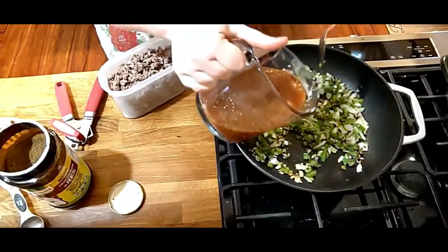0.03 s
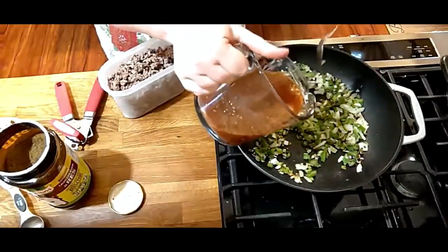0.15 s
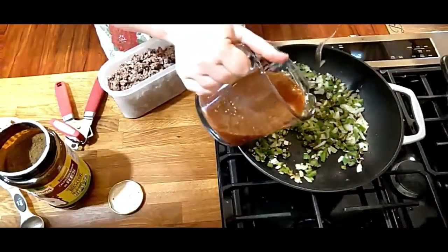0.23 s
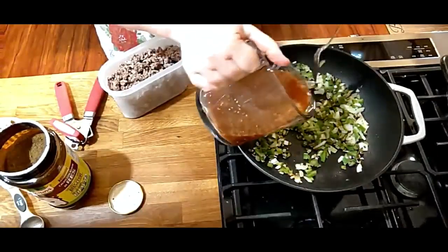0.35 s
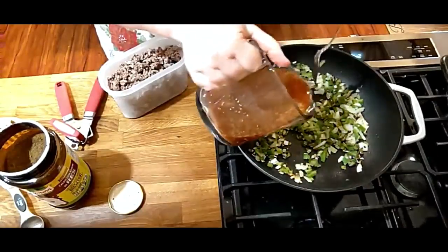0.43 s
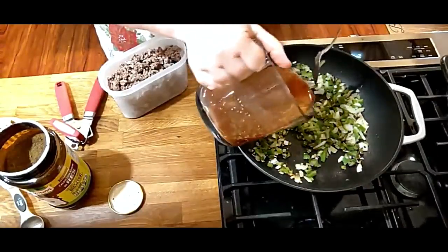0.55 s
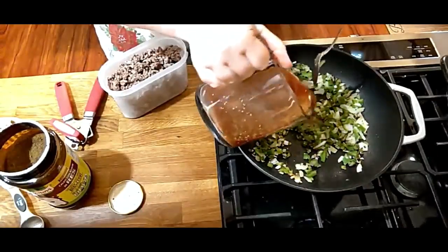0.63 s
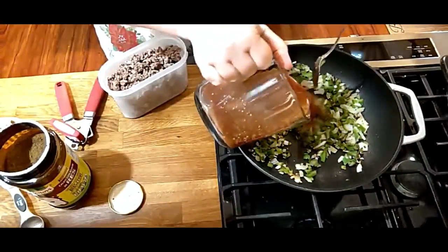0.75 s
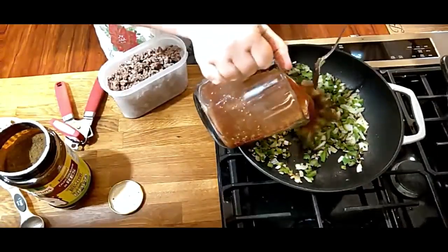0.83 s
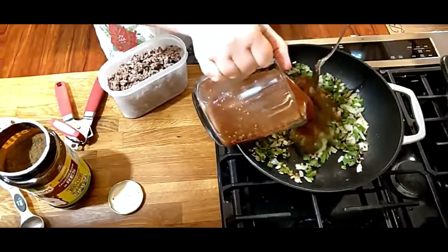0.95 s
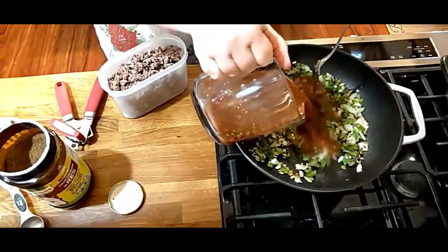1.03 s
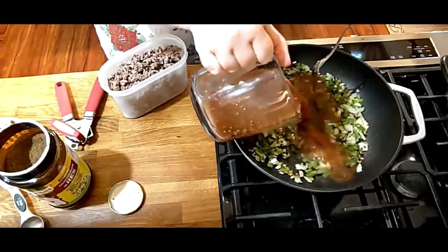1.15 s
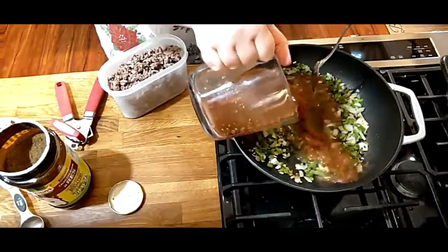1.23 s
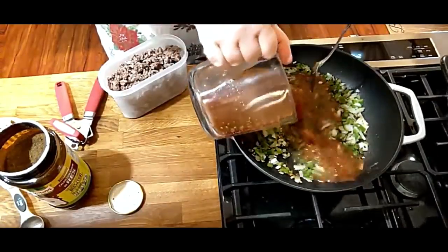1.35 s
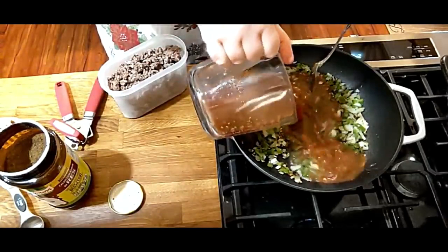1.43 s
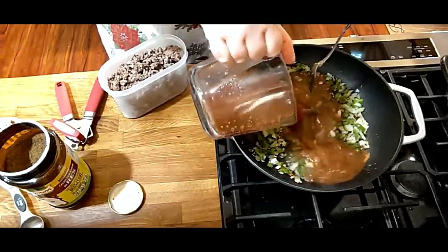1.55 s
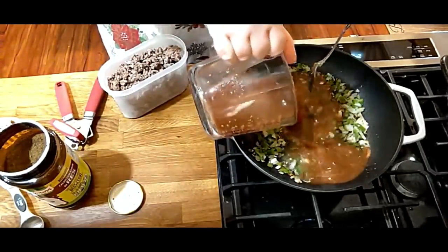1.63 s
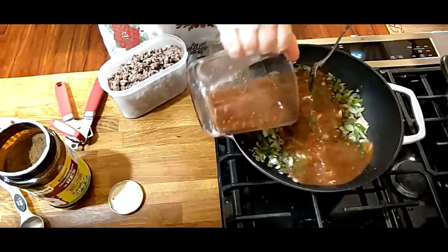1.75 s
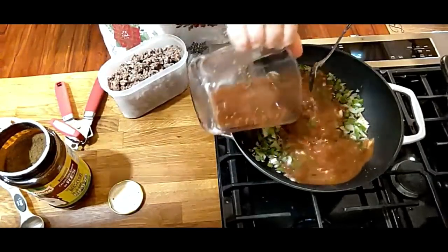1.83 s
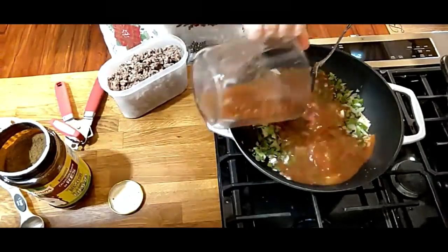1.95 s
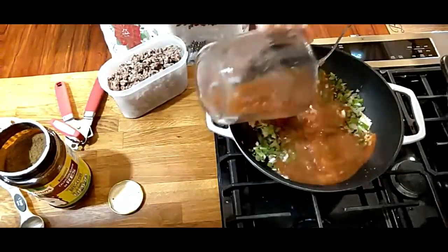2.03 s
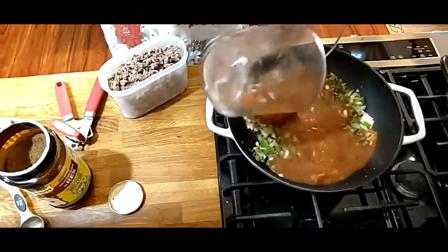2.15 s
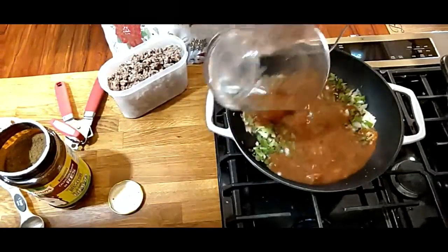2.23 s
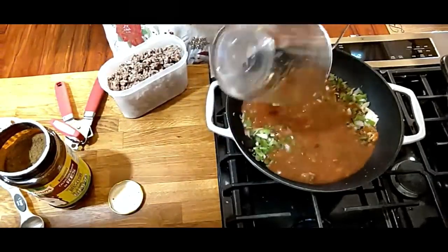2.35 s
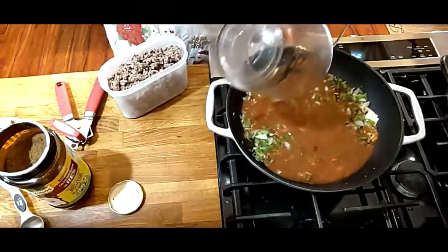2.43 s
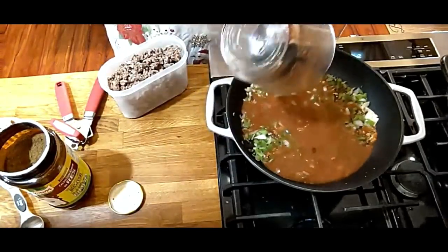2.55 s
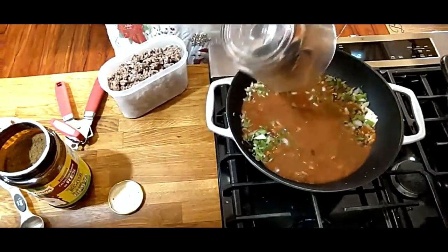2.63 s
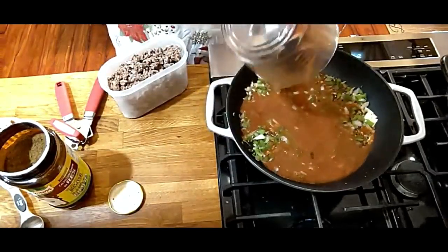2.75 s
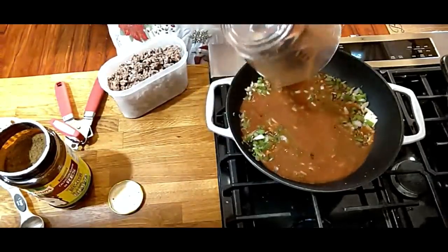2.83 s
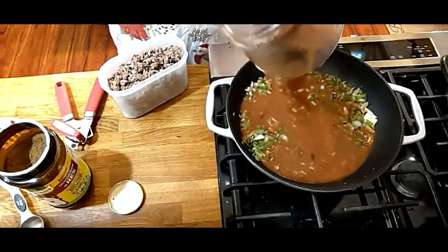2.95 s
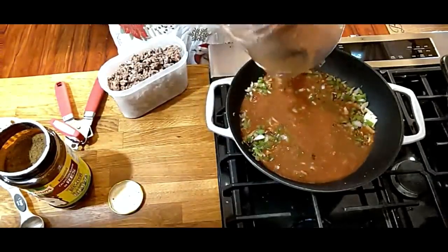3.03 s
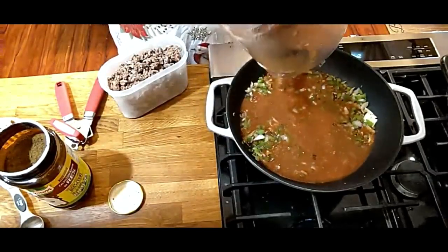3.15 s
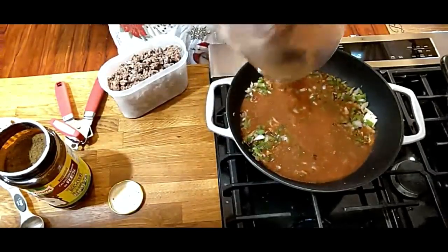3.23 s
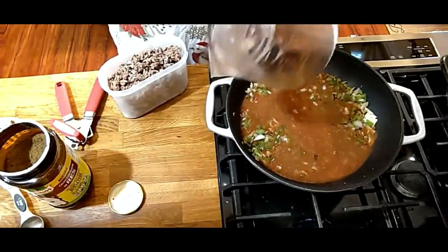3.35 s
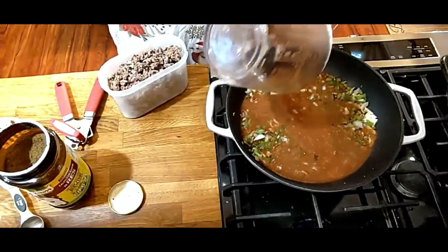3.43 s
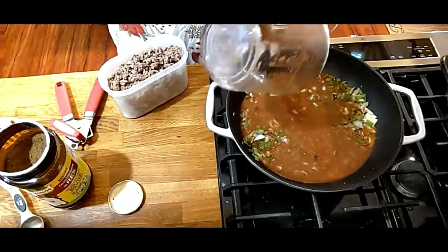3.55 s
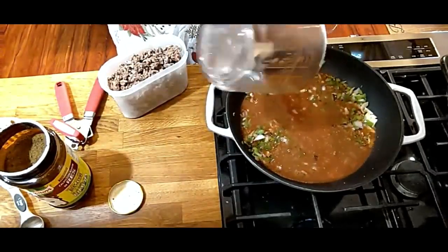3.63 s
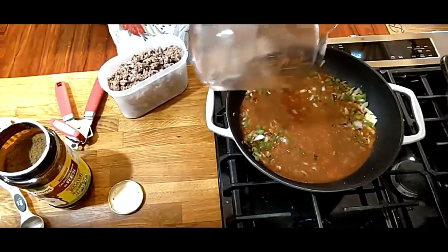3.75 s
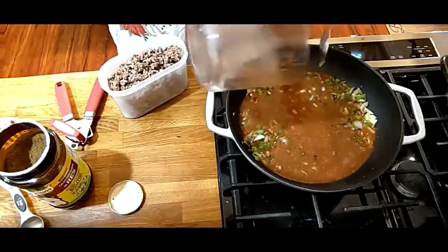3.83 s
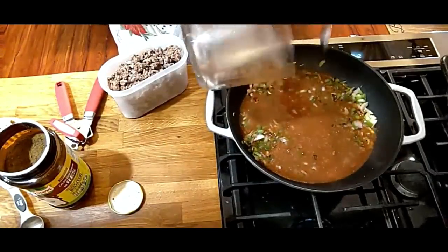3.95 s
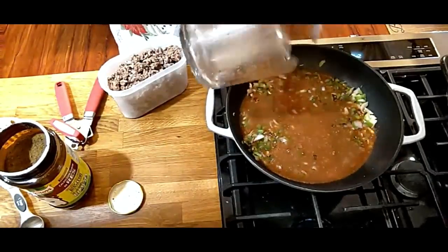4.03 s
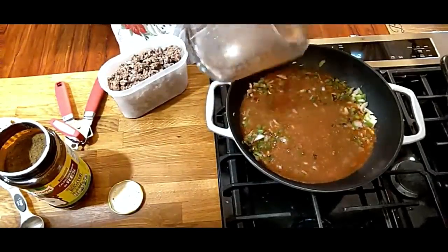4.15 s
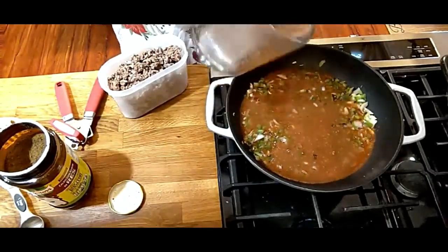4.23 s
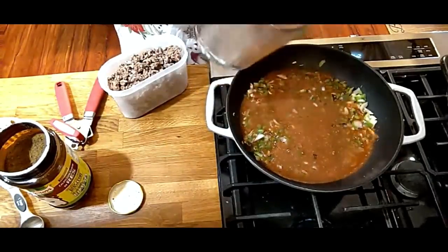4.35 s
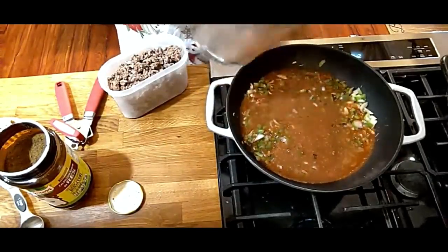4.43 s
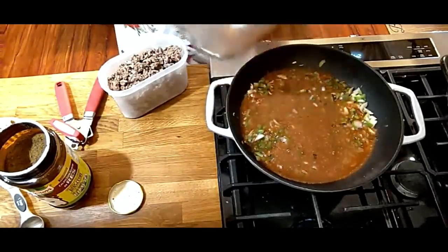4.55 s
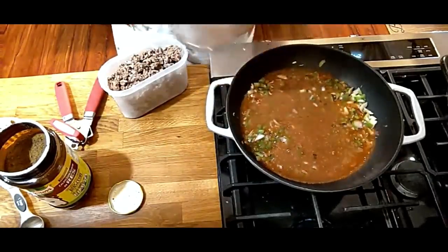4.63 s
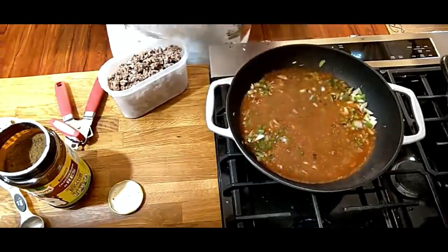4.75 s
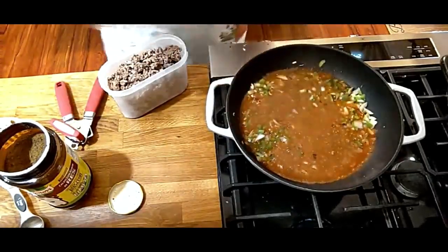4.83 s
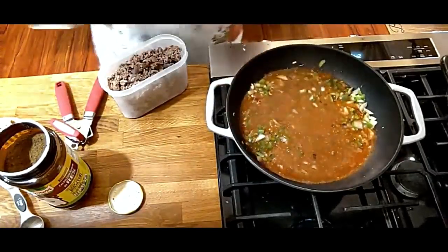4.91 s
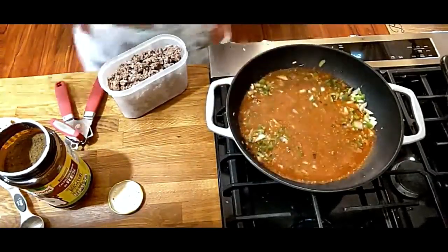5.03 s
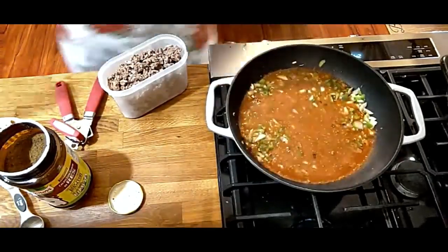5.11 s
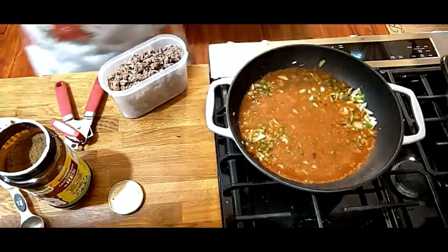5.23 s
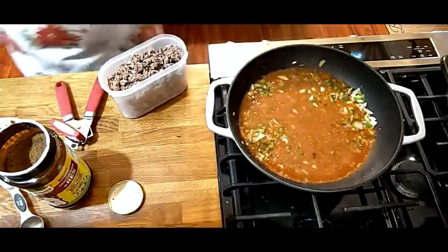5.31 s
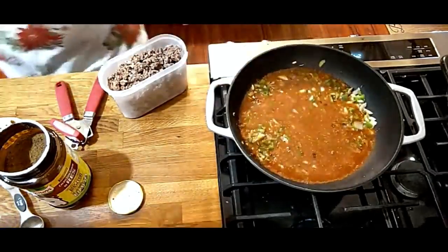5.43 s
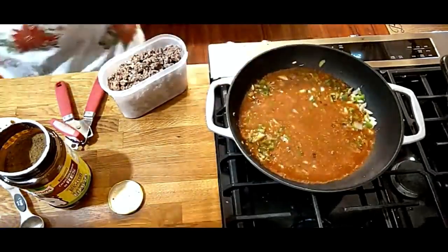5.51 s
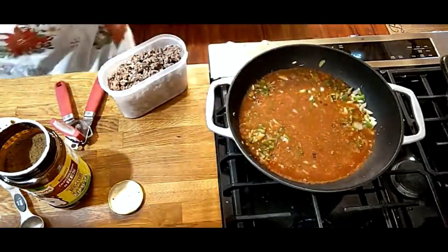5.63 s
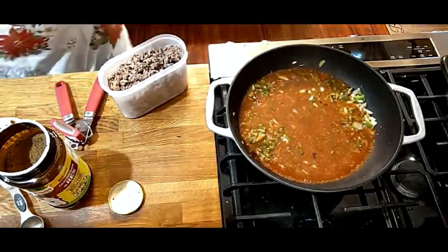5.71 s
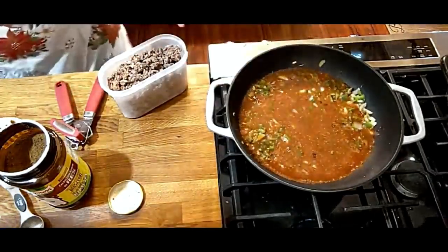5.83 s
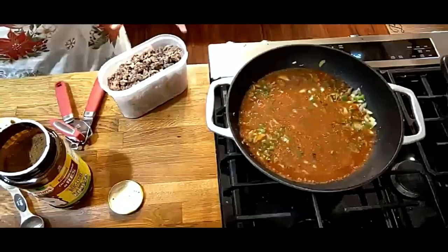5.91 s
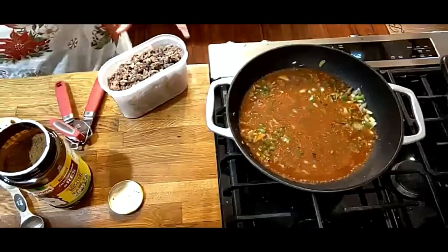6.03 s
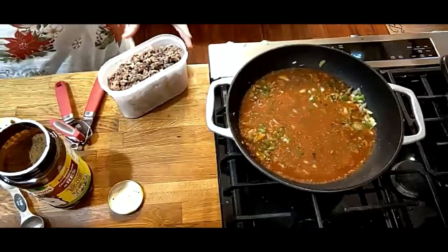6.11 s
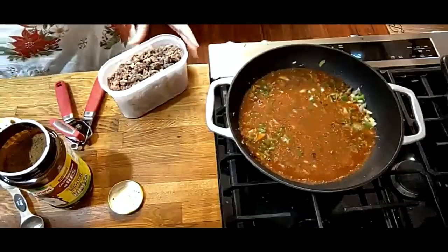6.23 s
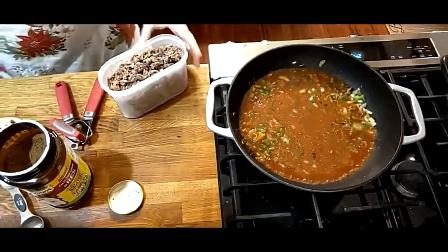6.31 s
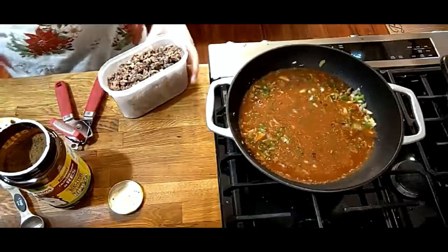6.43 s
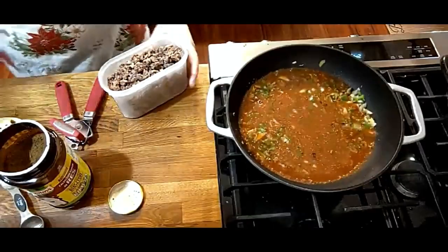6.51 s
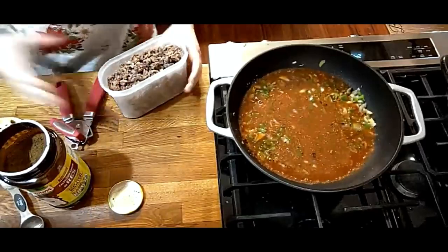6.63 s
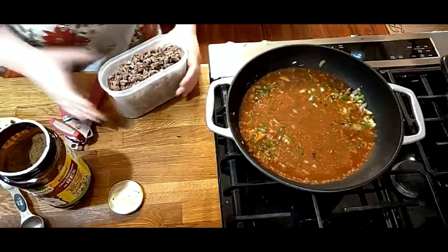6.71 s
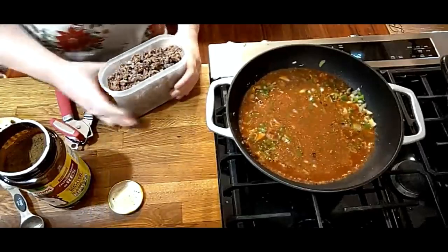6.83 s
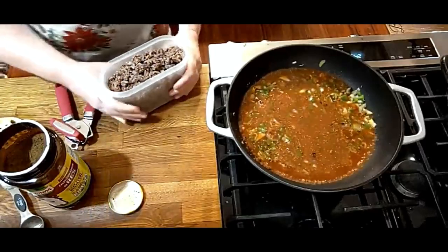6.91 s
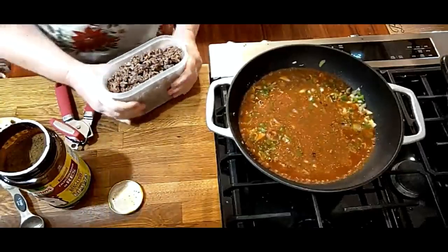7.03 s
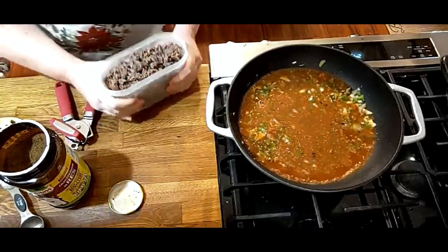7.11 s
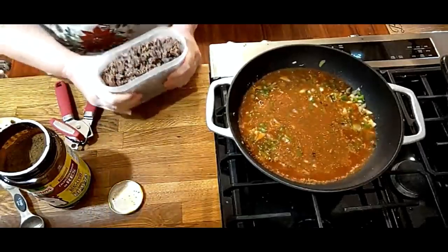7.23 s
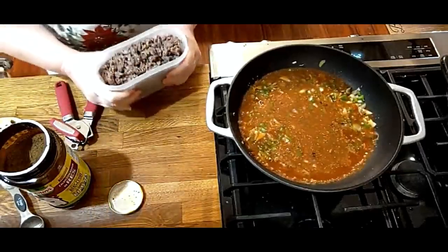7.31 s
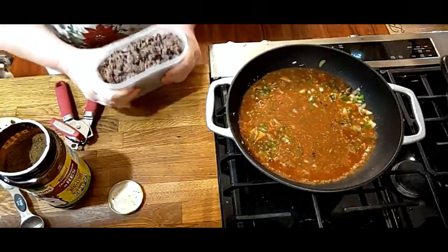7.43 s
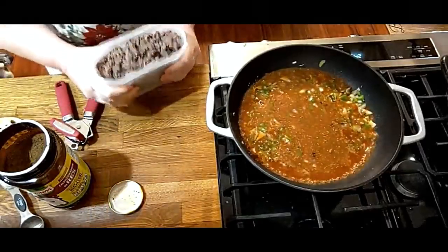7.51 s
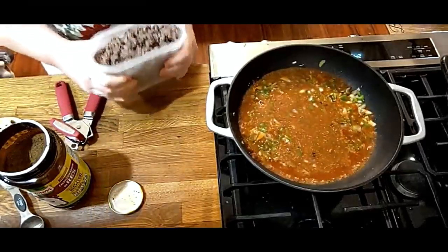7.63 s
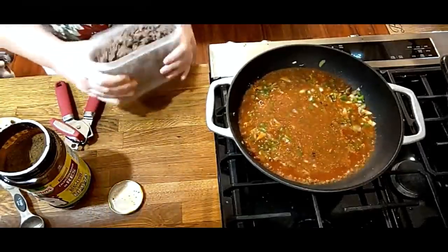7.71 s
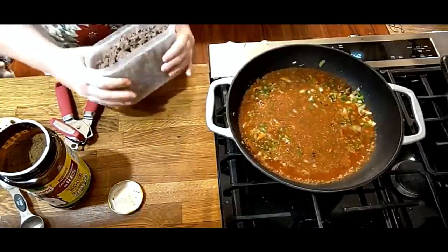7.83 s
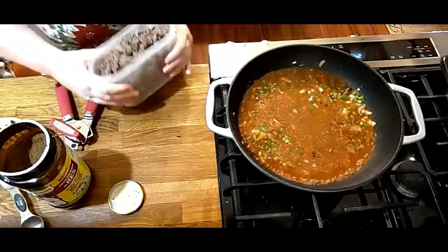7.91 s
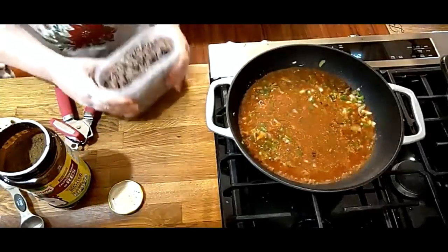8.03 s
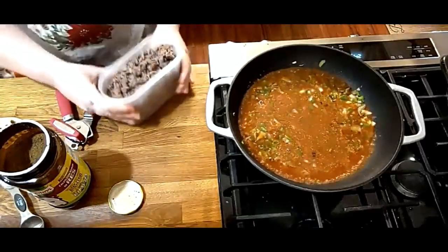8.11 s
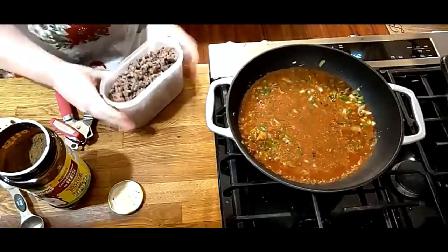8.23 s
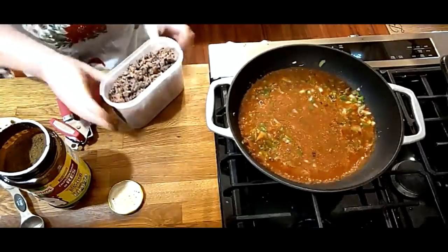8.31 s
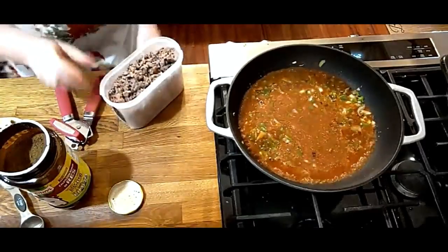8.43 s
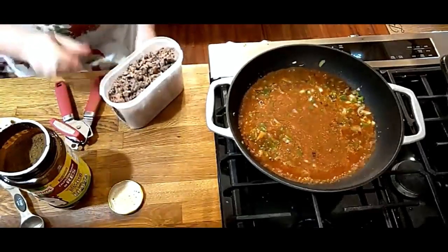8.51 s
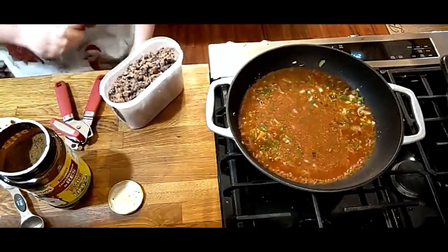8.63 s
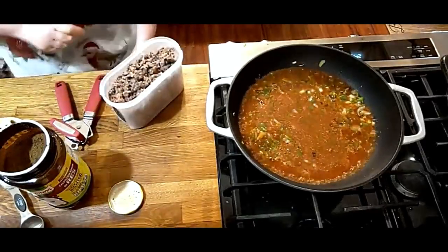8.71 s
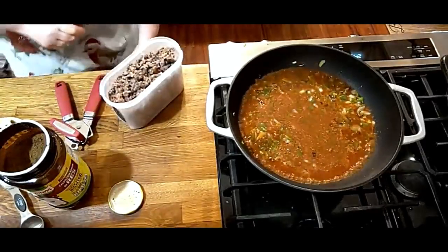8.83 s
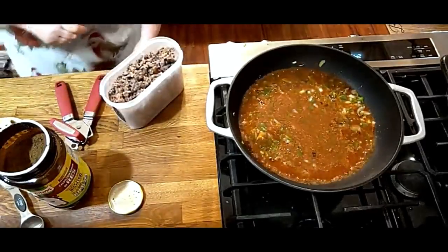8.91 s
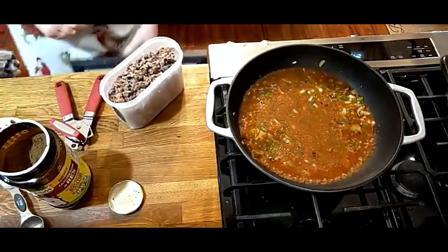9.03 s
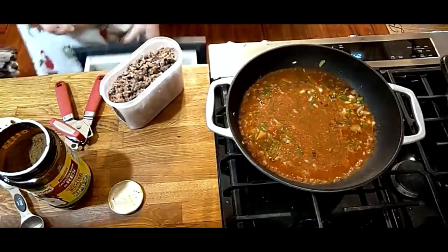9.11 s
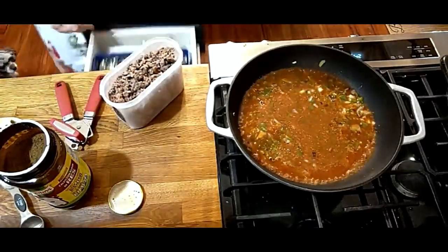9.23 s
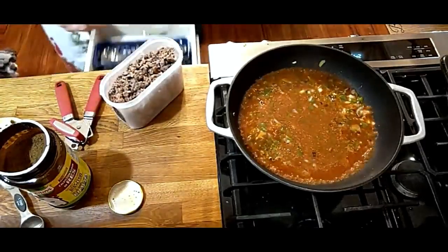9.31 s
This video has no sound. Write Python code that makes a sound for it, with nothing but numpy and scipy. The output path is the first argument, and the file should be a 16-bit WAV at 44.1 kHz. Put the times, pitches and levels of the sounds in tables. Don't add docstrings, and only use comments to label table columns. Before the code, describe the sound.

Quiet frying swells into a fierce hiss as liquid hits the pan, then fades while metal clinks, wood bumps and a tub thuds nearby.

```python
import sys
import numpy as np
from scipy import signal
from scipy.fft import rfft, irfft, next_fast_len
from scipy.io import wavfile
from scipy.ndimage import uniform_filter1d

SR = 44100
rng = np.random.default_rng(int(sys.argv[2]) if len(sys.argv) > 2 else 0)


def int16_out(signal):
    q = np.round(np.clip(np.atleast_2d(signal).T, -1, 1) * 32767)
    wavfile.write(sys.argv[1], SR, q.astype(np.int16))


def volts_from_db(level):
    exponent = np.asarray(level, float) / 20
    return 10 ** exponent


N = 412813


def evened(x):
    return x / np.sqrt(np.mean(x ** 2) + 1e-20)


def read(points, hz):
    f, value = np.transpose(points)
    return np.interp(np.log(hz + 1), np.log(f + 1), value)


def add(mix, s, sound):
    part = mix[:, round(s * SR):][:, :sound.shape[1]]
    part += sound[:, :part.shape[1]]


def panned(db):
    return volts_from_db(np.array([[db / 2], [-db / 2]]))


def filtered(order, hz, kind, x):
    return signal.sosfilt(signal.butter(order, hz, kind, fs=SR, output="sos"), x)


def resonance(hz, width_hz, x):
    return evened(signal.lfilter(*signal.iirpeak(hz, hz / width_hz, SR), x))


def pops(per_s, spread_db, size):
    size_db = spread_db * np.minimum(rng.exponential(1, size), 5)
    sign = np.sign(rng.random(size) - .5)
    return volts_from_db(size_db) * sign * (rng.random(size) < per_s / SR)


# (time [s], level [dB])
BOIL = [(0.6, -50), (0.85, -41), (0.88, -33), (0.95, -13.5), (1.05, -5.5), (1.3, -2), (1.75, -2.5),
        (2.05, -2.5), (2.4, -0.5), (2.7, -3.5), (3.1, -2.5), (3.5, -5.5), (4.5, -7.5), (5.4, -10.5),
        (6.5, -12.5), (8.3, -15.5), (8.85, -18.5), (9.36, -20)]


def vigour(t):
    return np.interp(t, *np.transpose(BOIL), -80)


BUBBLE_HZ = [150, 350, 1200, 3700, 9000]
# (share of the vigour followed [1], lag [s], dry frying re full boil [dB])
BUBBLE_SIZES = [
    (0.62, 0.37, -29),
    (0.4, 0.072, -18),
    (0.73, 0.021, -38.5),
    (0.73, 0.0096, -30.5),
    (0.8, -.03, -22.5),
]
# (frequency [Hz], level [dB per Hz])
STEAM = [(59, -74), (100, -33), (143, -6), (274, -14.5), (502, -15.5), (570, -17), (646, -9), (1000, -2.5),
         (2230, 0.5), (2920, -3.5), (4940, -2), (9860, -2), (11900, -5.5), (14100, -3), (15000, -67)]
# (frequency [Hz], width [Hz], level [dB])
PAN_HUM = [(338, 150, 8.5), (846, 20, -22), (4020, 2900, 5.5), (11940, 1500, 7)]
# (frequency [Hz], left minus right level [dB])
SHADE = [(60, -1.5), (380, 0.5), (700, -4), (1300, 0), (2400, -.5), (4400, -2.5), (7000, -4), (9000, -10),
         (10500, -18.5), (15000, -48.5)]
# (frequency [Hz], left-right likeness [1])
SAME = [(100, 0.84), (350, 0.99), (700, 0.12), (1500, 0.55), (4000, 0.043), (8000, 0.31), (11000, 0.028)]


def sizzle():
    per_s, spread_db, smooth = 9000, 1.0, 0.73
    patchy_db, flicker_db = 1.58, 0.65
    steam_db, lag_samples = -27, 12
    clicks = np.array([evened(p) for p in pops(per_s, spread_db, (2, N))])
    bursts = clicks + smooth * rng.standard_normal((2, N))
    hz, t, (near, other) = signal.stft(bursts, SR, nperseg=1024, noverlap=768)

    sizes_db = np.array([20 * np.log10(np.hypot(volts_from_db(follow * vigour(t - lag)), volts_from_db(frying_db)))
                         for follow, lag, frying_db in BUBBLE_SIZES])
    share = np.array([read(list(zip(BUBBLE_HZ, row)), hz) for row in np.eye(len(BUBBLE_HZ))])
    hum_db = sum(db / (1 + (2 * (hz - f) / width) ** 2) for f, width, db in PAN_HUM)
    patches = evened(uniform_filter1d(uniform_filter1d(rng.standard_normal(near.shape), 7, 0), 22, 1))
    flicker = evened(uniform_filter1d(rng.standard_normal(len(t)), 5))
    level_db = (read(STEAM, hz) + hum_db)[:, None] + share.T @ sizes_db
    level = volts_from_db(level_db + patchy_db * patches + flicker_db * flicker)

    same = np.clip(read(SAME, hz), 0, 1)[:, None]
    shade = volts_from_db(read(SHADE, hz))[:, None]
    late = np.exp(-2j * np.pi * hz * lag_samples / SR)[:, None]
    left = shade * late * (same * near + np.sqrt(1 - same ** 2) * other)
    bands = np.array([left, near]) * level / np.sqrt(1 + shade ** 2)
    x = signal.istft(bands, SR, nperseg=1024, noverlap=768)[1][:, :N]
    full_boil = x.mean(0)[int(1.5 * SR):int(3.5 * SR)]
    return volts_from_db(steam_db) * x / np.std(full_boil)


# (time [s], peak level [dB], frequency [Hz], left minus right level [dB])
SPITS = [
    (0.0764, -18.5, 7000, -6),
    (0.2583, -52, 6900, 19),
    (0.765, -30, 9000, -15),
    (0.875, -29, 8200, -12),
]


def spits():
    t, out = np.arange(900) / SR, np.zeros((2, N))
    for s, db, hz, pan_db in SPITS:
        band = [hz / 1.24, min(hz * 1.17, 16000)]
        puff = evened(filtered(1, band, "bandpass", rng.standard_normal((2, len(t)))))
        add(out, s, 0.25 * volts_from_db(db - 60 * t / 0.038) * panned(pan_db) * puff)
    return out


def pan_note():
    note_hz, width_hz, note_db, waver_db = 567, 14, -48, -1.5
    covered_s, damping_db_per_s = 3.33, 15
    t = np.arange(N) / SR
    shake = rng.standard_normal(N) + 1.1 * rng.standard_normal((2, N))
    note = resonance(note_hz, width_hz, shake)
    waver = evened(uniform_filter1d(rng.standard_normal(N), size=SR // 8))
    damped_db = damping_db_per_s * np.maximum(t - covered_s, 0)
    return volts_from_db(note_db + vigour(t - .15) + waver_db * waver - damped_db) * note


def ring(modes, hardness_db, damping, uneven_db, rise_s, split):
    hz, db, t60 = (column[:, None] for column in np.transpose(modes * 3))
    t = np.arange(int(np.clip(.8 * damping * t60.max(), .1, .62) * SR)) / SR
    chance = rng.standard_normal((len(hz), 4))
    partner = (np.arange(len(hz)) >= len(modes))[:, None]
    hz = hz * (1 + split * chance[:, 3:] * partner)
    db = db - 5.2 * partner
    gain = volts_from_db(db + hardness_db * np.log2(hz / hz.mean()) + uneven_db * chance[:, :1])
    swing = np.exp((2j * np.pi * hz - np.log(1000) / (damping * t60)) * t)
    apart = np.minimum(hz / 900, .9) * chance[:, 1:3]
    x = ((gain * np.exp(1j * apart)).T @ swing).imag * (1 - np.exp(-t / rise_s))
    return x / abs(x).max()


def blows(events, modes, uneven_db, rise_s, split, crack_db, crack_hz, crack_s, bass_hz):
    out, t = np.zeros((2, N)), np.arange(4000) / SR
    for s, db, hardness_db, pan_db, damping in events:
        sound = ring(modes, hardness_db, damping, uneven_db, rise_s, split)
        crack = evened(filtered(1, crack_hz, "lowpass", rng.standard_normal((2, len(t)))))
        add(sound, 0, volts_from_db(crack_db - 60 * t / crack_s) * crack)
        add(out, s, volts_from_db(db) * panned(pan_db) * filtered(3, bass_hz, "highpass", sound))
    return out


# (time [s], peak level [dB], hardness [dB per octave], left minus right level [dB], ring damping factor [1])
JUG_KNOCKS = [
    (.2905, -14.5, 3.5, 0, 1),
    (.304, -21, 7, -19.5, 0.9),
    (.325, -21.5, -5, -4, 0.29),
    (.379, -22.5, -3, 0, 0.66),
    (.445, -78.5, 16, -26, .9),
]
# (frequency [Hz], level [dB], t60 [s])
JUG_AND_PAN = [(85, -17, 0.21), (166.5, -9.5, 0.23), (260, -17, 0.11), (365, -12.5, 0.11), (488, -15, 0.29),
               (637, 0.5, 0.12), (760, -14, 0.11), (904, -33, 1.8), (913, -0.5, 0.13), (1175, -3.5, 0.27),
               (1200, -23, 0.33), (1360, -24, 0.13), (1775, -11, 0.24), (1943, -15, 0.42),
               (2240, -18, 0.13), (2520, -29.5, 0.53), (2660, -26, 0.32), (2970, -24, 0.098),
               (3300, -24, .06), (3620, -17.5, 0.066), (4620, -32, .1)]


def jug():
    return blows(JUG_KNOCKS, JUG_AND_PAN, uneven_db=-1.0, rise_s=0.00097, split=0.0117,
                 crack_db=-22.0, crack_hz=2450, crack_s=0.12, bass_hz=90)


# (time [s], peak level [dB], hardness [dB per octave], left minus right level [dB], ring damping factor [1])
SPOON_BLOWS = [
    (4.6235, -3.5, 1, -8.5, 0.88),
    (4.636, -25, 0.42, -5, .5),
    (4.645, -18, 1, -17, 0.38),
]
# (frequency [Hz], level [dB], t60 [s])
SPOON = [(560, -24, .15), (2584, -13, .12), (2778, 0, .1), (3531, -11, .14), (4560, -10, .15),
         (4872, -3, .14), (5722, -13, .15), (6400, -14, .1), (7750, -9, .09), (8400, -14, .08),
         (10400, -14, .08), (11630, -7, .1), (12260, -10, .1), (13030, -7, .09), (13880, -12, .08)]


def spoon():
    return blows(SPOON_BLOWS, SPOON, uneven_db=5.0, rise_s=0.002, split=0.009,
                 crack_db=-21, crack_hz=13100, crack_s=0.05, bass_hz=314)


# (time [s], peak level [dB], hardness [dB per octave], left minus right level [dB], ring damping factor [1])
CUTLERY_BLOWS = [
    (4.825, -10, -0.74, -1, 0.9),
    (4.8278, -2.5, -0.27, 3, 0.35),
    (4.845, -29, 1, -8, 0.49),
    (4.885, -12, 0.81, 5, 0.99),
    (4.915, -12.5, 1, -7, 1),
]
# (frequency [Hz], level [dB], t60 [s])
CUTLERY = [(850, -18, .05), (1960, -15, .2), (2550, -9, .25), (2760, -8, .25), (3550, -17, .14),
           (4210, -14, .2), (4560, -16, .15), (4840, -7, .3), (5095, -1, .3), (5300, -6, .15),
           (5720, -18, .15), (6300, -15, .15), (7110, -14, .25), (7355, -9, .3), (7750, -15, .2),
           (8710, -20, .2), (9220, -6, .12), (9550, -17, .12), (10300, -19, .12), (11600, -10, .14),
           (11870, -9, .18), (12200, -12, .12), (13100, -16, .09), (13900, -17, .15)]


def cutlery():
    return blows(CUTLERY_BLOWS, CUTLERY, uneven_db=4.5, rise_s=0.00054, split=0.007,
                 crack_db=-14, crack_hz=9000, crack_s=0.026, bass_hz=298)


# (time [s], level [dB], t60 [s], frequency of the pieces woken [Hz])
RATTLES = [(4.64, -25, 0.063, 7700), (4.70, -43, 1, 3020), (4.79, -34.5, 0.035, 5000),
           (4.836, -24, 0.17, 4000), (4.85, -32, 0.29, 11700), (4.881, -32, 0.23, 10900),
           (4.931, -30.5, 0.26, 7400), (4.94, -35, 0.33, 2580), (5.935, -32.5, 0.26, 3280),
           (5.954, -38, 0.42, 7340), (6.1, -37.5, 0.55, 2970), (6.135, -36.5, 0.12, 6400),
           (6.155, -48, 0.17, 3500)]


def rattle():
    per_s, spread_db, damping, split, tick_db = 900, 4.0, 0.38, 0.02, -8
    octave_db, rise_s = 17, 0.0013
    t, out = np.arange(N) / SR, np.zeros((2, N))
    span = slice(int(4.6 * SR), int(6.4 * SR))
    u = t[:SR // 10]
    s, jolt_db, fade, woken_hz = np.transpose(RATTLES)[:, :, None]
    since = np.maximum(t[span] - s, 0)
    shaking = volts_from_db(jolt_db - 60 * since / fade) * (1 - np.exp(-since / rise_s))
    for hz, db, t60 in CUTLERY:
        share = volts_from_db(-octave_db * abs(np.log2(hz / woken_hz[:, 0])))
        pair = hz * (1 + split * rng.standard_normal()), hz
        beating = sum(np.sin(2 * np.pi * f * u + rng.uniform(0, 2 * np.pi / 3, (2, 1))) for f in pair)
        tone = volts_from_db(db - 60 * u / (damping * t60)) * beating
        taps = pops(per_s, spread_db, shaking.shape[1]) * (share @ shaking)
        ringing = signal.oaconvolve(taps[None], tone, axes=1)[:, :len(taps)]
        out[:, span] += volts_from_db(-3) * panned(0.66 * read(SHADE, hz)) * ringing
    ticks = evened(np.diff(pops(per_s * 4, spread_db, (2, shaking.shape[1])), prepend=0))
    out[:, span] += volts_from_db(tick_db) * shaking.sum(0) * ticks
    return out


# (time [s], peak level [dB], hardness [dB per octave], left minus right level [dB], ring damping factor [1])
CUPBOARD_BUMPS = [
    (5.9235, -1.2, 2.5, -1.6, 0.75),
    (5.941, -12.5, 1.8, -1.1, 0.3),
    (5.989, -11, -1.8, 0, 0.56),
    (6.087, -17, -4, -1, 0.52),
    (6.096, -7.5, 2, -1.4, 1),
    (6.121, -7.5, -3.2, -0.8, 0.52),
    (6.165, -20.5, -1, 0, 0.6),
]
# (frequency [Hz], level [dB], t60 [s])
CUPBOARD = [(175, -17, 0.12), (227, -0.5, 0.062), (322, -1, 0.058), (495, -2, 0.085), (725, -18, 0.07),
            (930, -20, .065), (1150, -19, 0.06), (1420, -22, 0.05)]


def cupboard():
    return blows(CUPBOARD_BUMPS, CUPBOARD, uneven_db=3.5, rise_s=0.0013, split=0.084,
                 crack_db=-25, crack_hz=1200, crack_s=0.14, bass_hz=137)


# (time [s], peak level [dB], hardness [dB per octave], left minus right level [dB], ring damping factor [1])
TUB_BUMPS = [
    (8.178, -4.5, 1.9, -0.7, 0.8),
    (8.191, -6, 0.042, -1, 0.52),
    (8.198, -7, -1.1, 3, 0.21),
    (8.213, -18.5, -1.6, -12, 0.58),
]
# (frequency [Hz], level [dB], t60 [s])
TUB = [(131, -24.5, 0.15), (214, -10.5, 0.13), (336, -5.5, 0.092), (430, -22, 0.22), (598, -6.5, 0.057),
       (727, -1, 0.054), (936, -5, 0.045), (920, -19, 0.036), (1200, -19, 0.086), (1410, -40, 0.077),
       (1620, -32, 0.088), (1970, -35, 0.059), (2650, -28.5, 0.22), (3680, -37, .1), (4490, -29, .08),
       (7460, -36, .06)]


def tub():
    return blows(TUB_BUMPS, TUB, uneven_db=4.5, rise_s=0.0022, split=0.084,
                 crack_db=-25.5, crack_hz=3500, crack_s=0.32, bass_hz=96)


# (time [s], half length [s], level [dB])
DRAWER_CATCHES = [
    (9.18, 0.011, -7),
    (9.278, .035, -3),
]
# (frequency [Hz], width [Hz], level [dB])
DRAWER_BODY = [(170, 47, -2), (282, 24, -6.5), (40, 30, -25), (805, 110, -11.5)]


def drawer():
    start_s, rise_s, level_db = 9.0, 0.035, -44.5
    opening_db = 20
    t, out = np.arange(start_s, N / SR, 1 / SR), np.zeros((2, N))
    catches_db = sum(db * np.maximum(1 - abs(t - s) / half, 0) for s, half, db in DRAWER_CATCHES)
    rolling = np.minimum((t - t[0]) / rise_s, 1) * volts_from_db(level_db + catches_db)
    bumps = pops(1600, 4.5, len(t)) + .3 * pops(1500, 3.5, (2, len(t)))
    box = 0
    for hz, width_hz, db in DRAWER_BODY:
        tilt_db = opening_db * (t - t.mean()) * np.clip(np.log2(hz / 220), -1, 1)
        box = box + volts_from_db(db + tilt_db) * resonance(hz, width_hz, bumps)
    add(out, t[0], rolling * evened(box))
    return out


# (time [s], peak level [dB], frequency [Hz], t60 [s])
FLOOR_SWINGS = [
    (.33, -41, 44.5, .35),
    (.42, -43, 38, 0.5),
    (4.828, -37, 60, 0.14),
    (5.21, -40.5, 42.5, 0.4),
    (5.925, -48.5, 71, 0.46),
    (6.1, -38, 66, 0.27),
    (8.19, -42, 65.6, 0.48),
    (9.15, -47, 40, 0.35),
]


def floor_swings():
    out, t = np.zeros((2, N)), np.arange(SR // 2) / SR
    for s, db, hz, t60 in FLOOR_SWINGS:
        swing = np.sin(2 * np.pi * hz * t) * (1 - np.exp(-t / 0.0028))
        add(out, s, panned(2.2) * volts_from_db(db - 60 * t / t60) * swing)
    return out


# (frequency [Hz], t60 [s])
KITCHEN = [(100, 0.44), (500, 0.43), (2000, 0.39), (8000, 0.85), (15000, 0.052)]


def kitchen(x):
    taps = np.zeros((2, SR // 2))
    jitter = rng.integers(0, 20, (2, (SR // 2 - 201) // 20))
    at = np.arange(200, SR // 2 - 20, 20) + jitter
    np.put_along_axis(taps, at, rng.choice([-1., 1.], at.shape), 1)
    hz, t, z = signal.stft(taps, SR, nperseg=256)
    same = np.clip(read(SAME, hz), 0, 1)[:, None]
    z = np.array([same * z[1] + np.sqrt(1 - same ** 2) * z[0], z[1]])
    decay = volts_from_db(-60 * t / read(KITCHEN, hz)[:, None])
    tail = signal.istft(z * decay, SR, nperseg=256)[1]
    return signal.fftconvolve(x.mean(0)[None], tail / np.linalg.norm(tail[0]), axes=1)[:, :N]


# (frequency [Hz], level [dB per Hz])
ROOM_TONE = [(12, -40), (20, 5), (65, 3), (107, 0.5), (172, 11), (464, -24), (545, 4.5), (841, -13),
             (921, -12), (1500, -30), (1950, -55), (3300, -120)]


def room_tone():
    size = next_fast_len(N)
    noise = rng.standard_normal(size) + 0.11 * rng.standard_normal((2, size))
    spectrum = rfft(noise) * volts_from_db(read(ROOM_TONE, np.fft.rfftfreq(size, 1 / SR)))
    return volts_from_db(-60.5) * evened(irfft(spectrum, size)[:, :N])


def scene():
    pan = sizzle() + spits() + pan_note()
    knock, bump, thud = jug(), cupboard(), tub()
    clatter = cutlery() + rattle() + spoon()
    echo = kitchen(volts_from_db(1.5) * knock + volts_from_db(-7.0) * bump) + kitchen(volts_from_db(-12) * clatter + volts_from_db(-5.5) * thud)
    return pan + knock + clatter + bump + thud + echo + drawer() + floor_swings() + room_tone()


def roll_off(x):
    return signal.sosfilt(signal.butter(12, 14550, fs=SR, output="sos"), x)


def record(dry):
    knee, span = .7, .25
    squeezed = np.sign(dry) * (knee + span * np.tanh((abs(dry) - knee) / span))
    softened = np.where(abs(dry) > knee, squeezed, dry)
    lowpass = signal.firwin(255, 14450, window=("kaiser", 9), fs=SR)
    mix = signal.oaconvolve(softened, lowpass[None], "same")
    return roll_off(mix)


dry = scene()
out = record(dry)
int16_out(out)
```